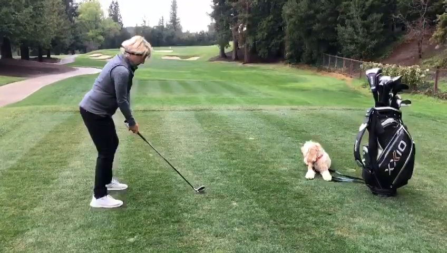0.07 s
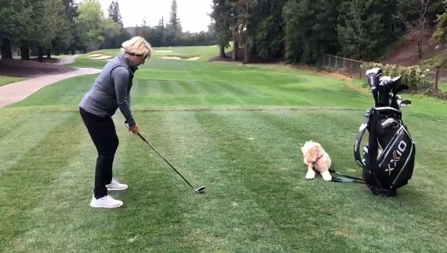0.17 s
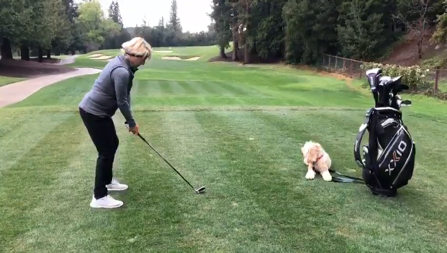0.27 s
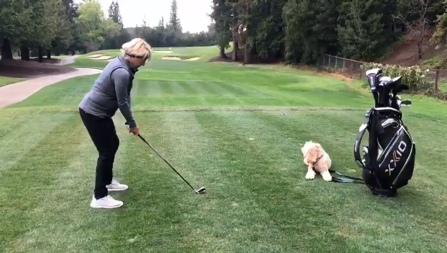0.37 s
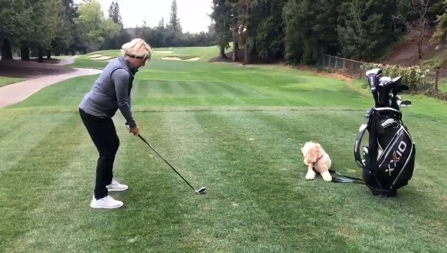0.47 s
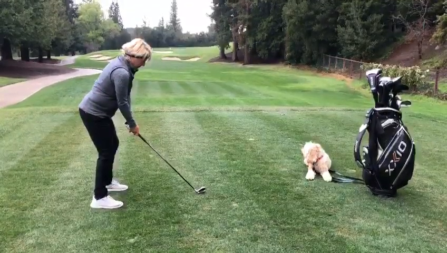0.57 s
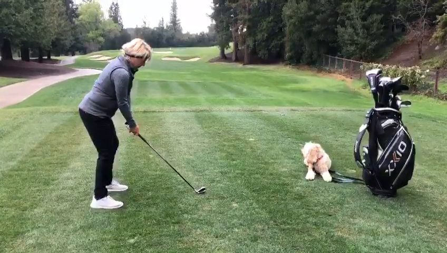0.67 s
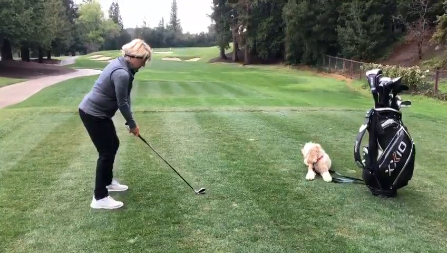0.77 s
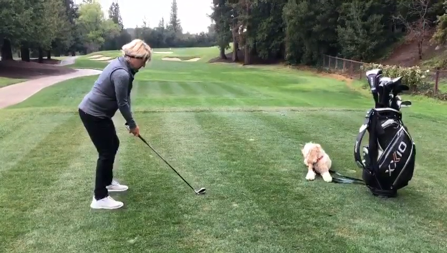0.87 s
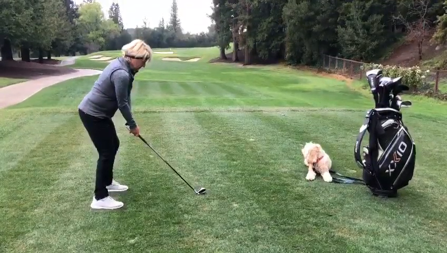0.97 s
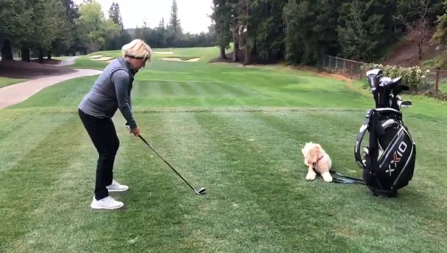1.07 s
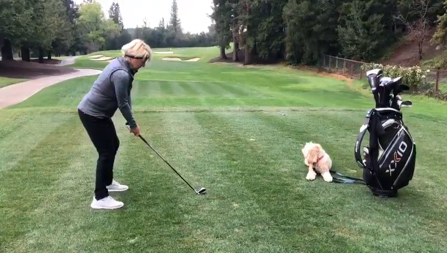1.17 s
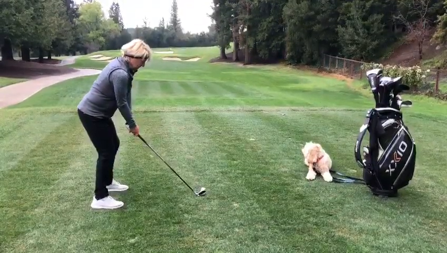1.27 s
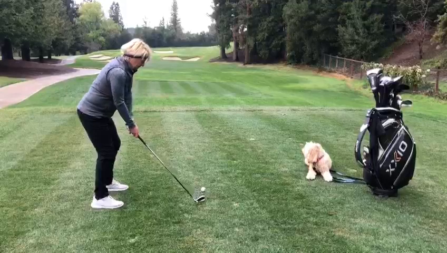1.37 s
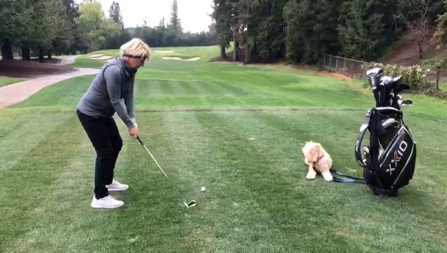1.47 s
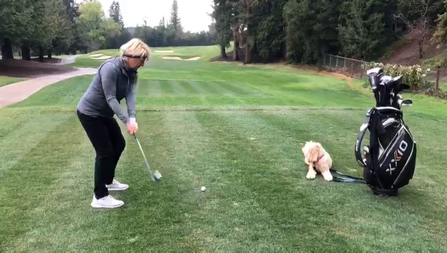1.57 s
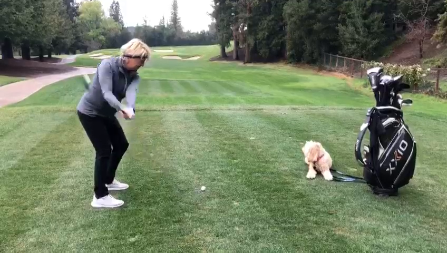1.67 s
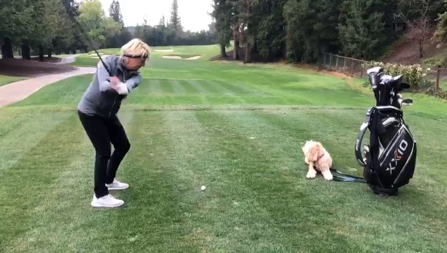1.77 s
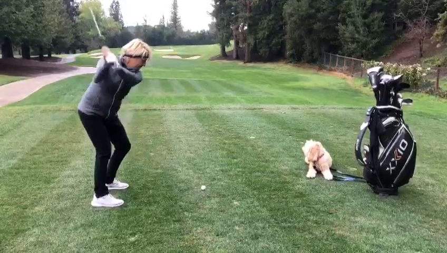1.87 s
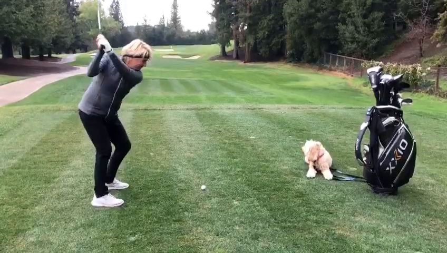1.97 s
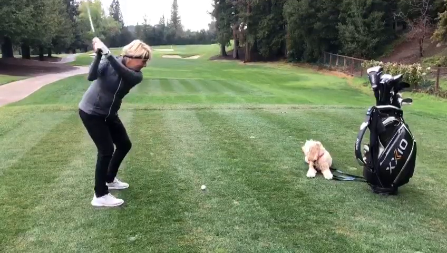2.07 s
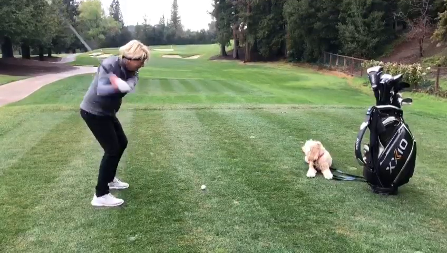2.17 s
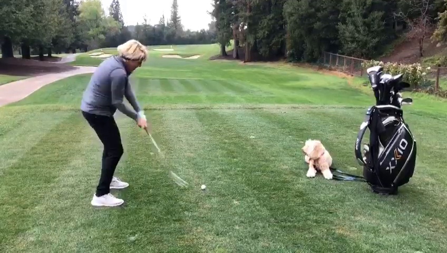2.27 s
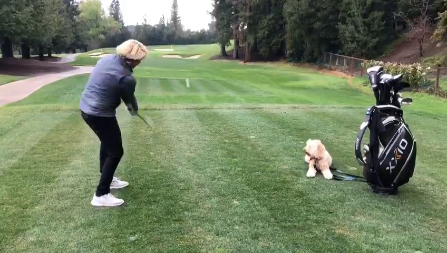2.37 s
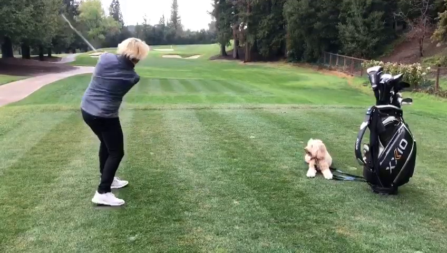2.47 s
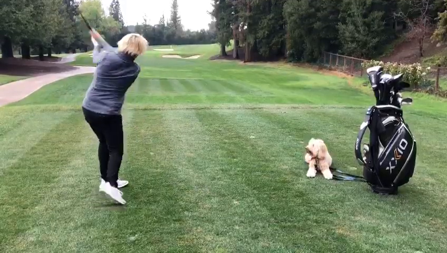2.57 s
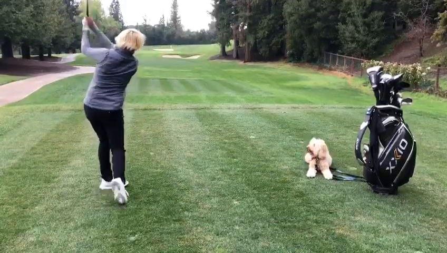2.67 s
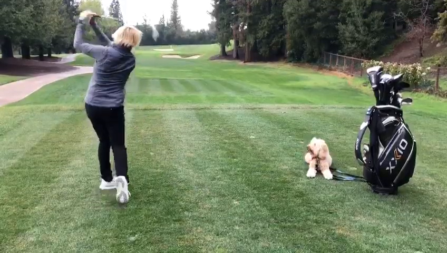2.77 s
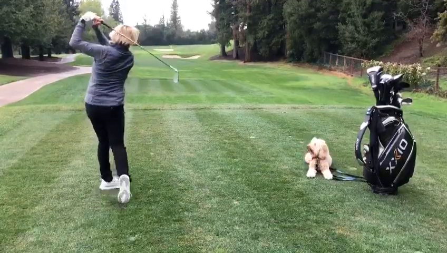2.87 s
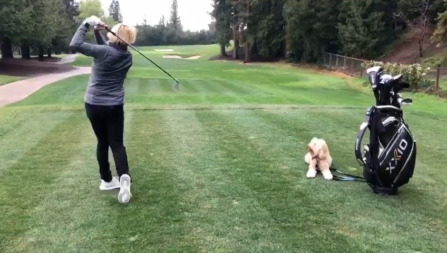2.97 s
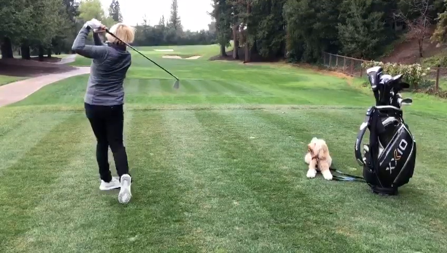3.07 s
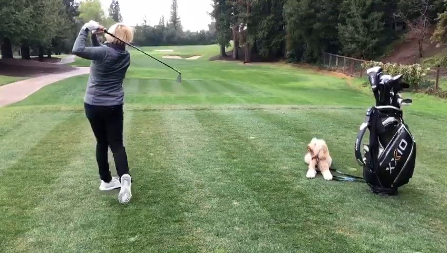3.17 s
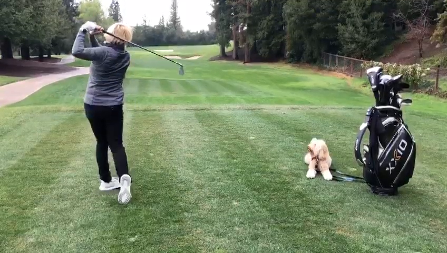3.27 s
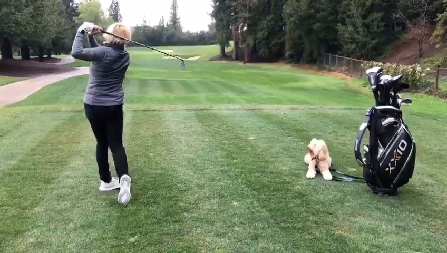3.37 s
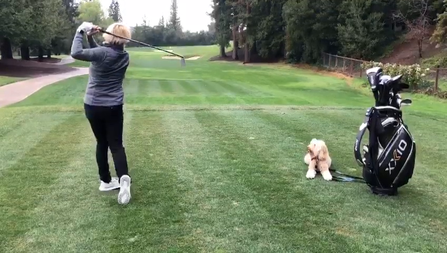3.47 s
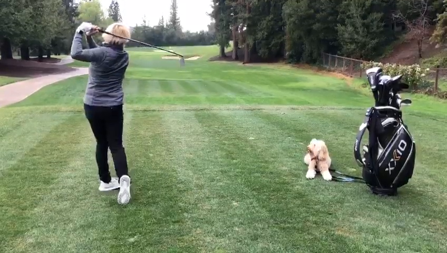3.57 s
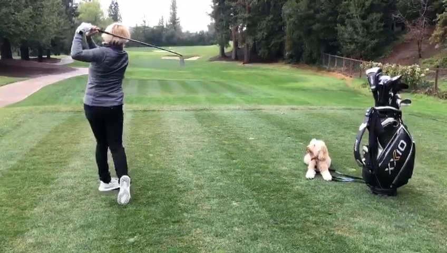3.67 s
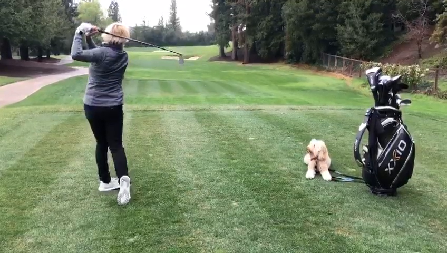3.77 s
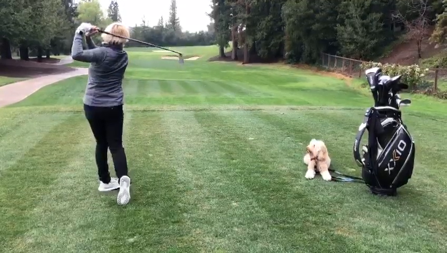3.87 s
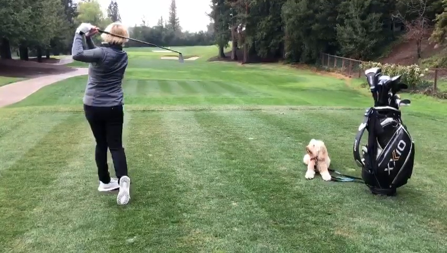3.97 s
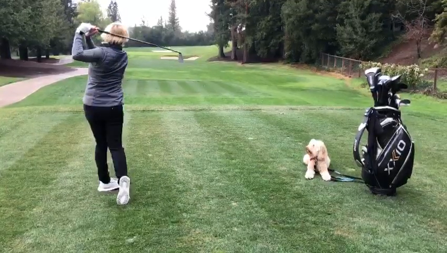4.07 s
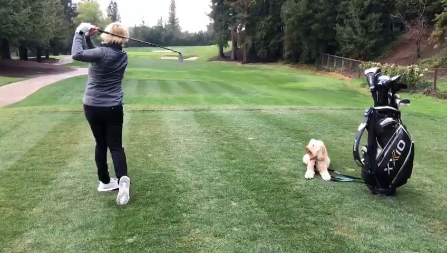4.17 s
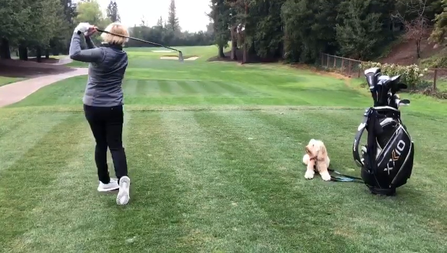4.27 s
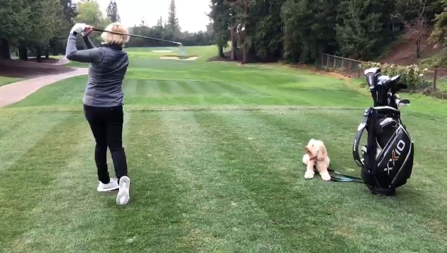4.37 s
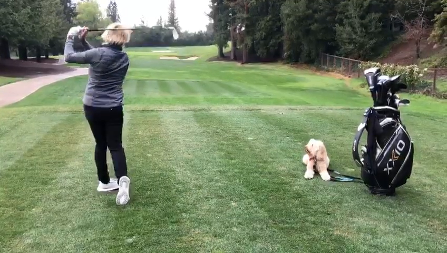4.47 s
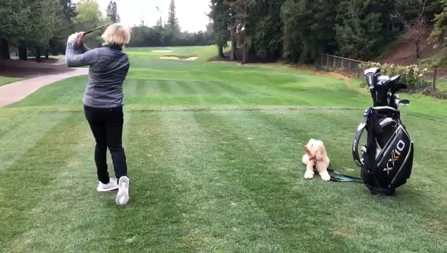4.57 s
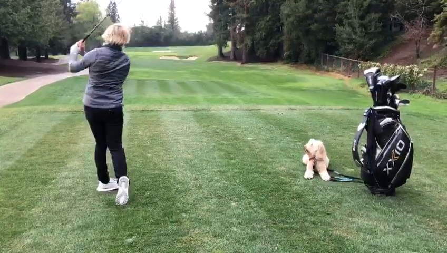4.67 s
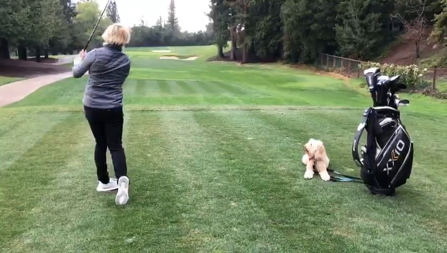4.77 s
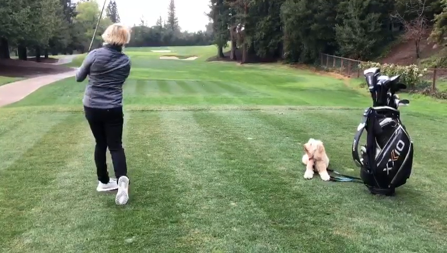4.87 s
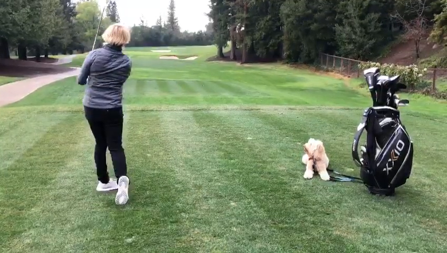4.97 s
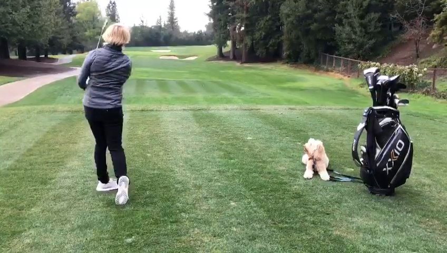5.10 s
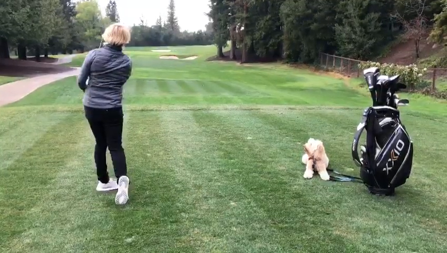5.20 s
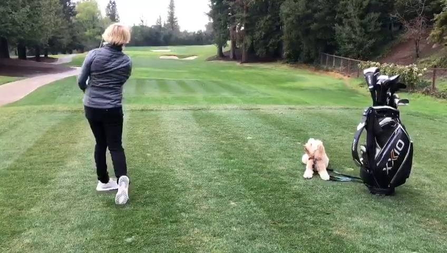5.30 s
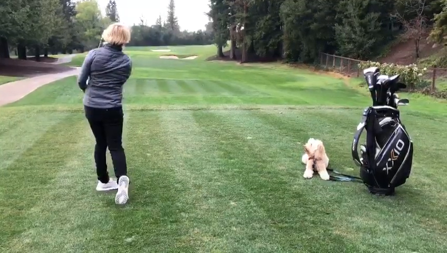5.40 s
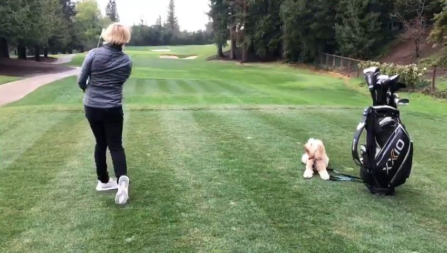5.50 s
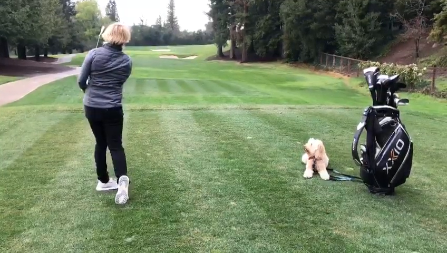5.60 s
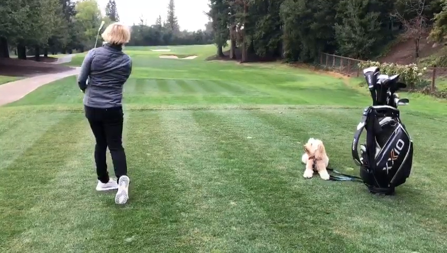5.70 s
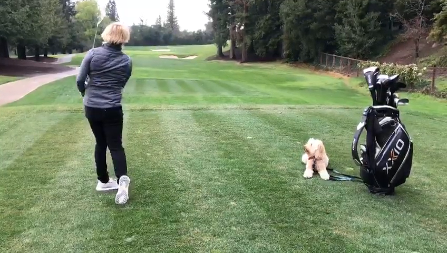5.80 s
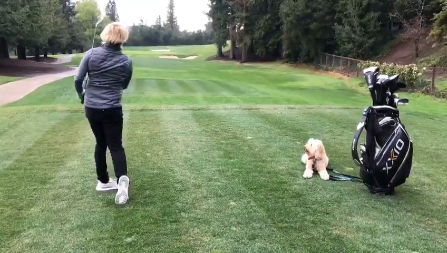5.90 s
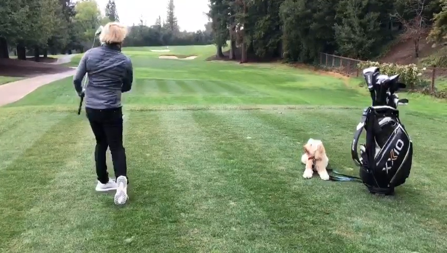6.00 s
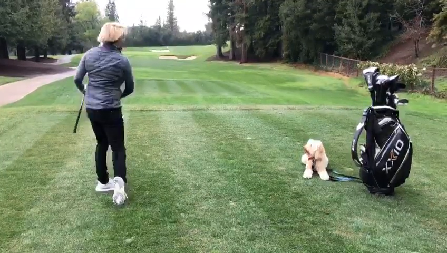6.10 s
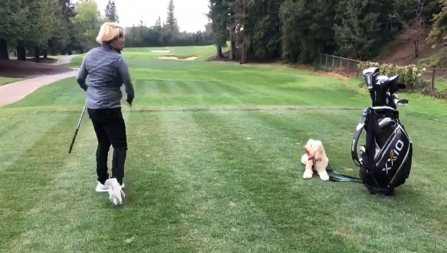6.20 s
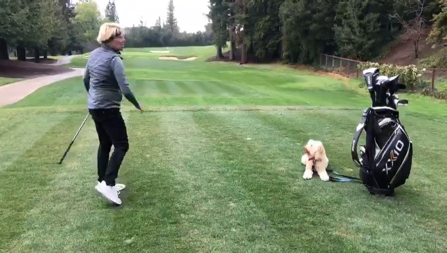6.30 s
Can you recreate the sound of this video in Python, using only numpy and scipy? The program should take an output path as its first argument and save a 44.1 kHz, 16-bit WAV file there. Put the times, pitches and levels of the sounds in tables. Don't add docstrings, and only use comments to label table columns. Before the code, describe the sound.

A single golf shot heard from a few metres behind the player. Low distant traffic and thin repeated bird whistles fill the open air. Jacket fabric rubs quietly, then a brief airy whoosh rises into a very short, clicky metallic smack with a small thud beneath. The crack sputters back from fence and woods and fades; birds resume, with a faint late clothing rustle.

```python
import sys
import numpy as np
from scipy import signal
from scipy.fft import rfft, irfft, next_fast_len
from scipy.io import wavfile
from scipy.ndimage import uniform_filter1d

SR = 44100
rng = np.random.default_rng(int(sys.argv[2]) if len(sys.argv) > 2 else 0)


def linear_from_db(decibels):
    return 10 ** (np.asarray(decibels, float) / 20)


def master_out(mix):
    frames = np.transpose(np.atleast_2d(mix))
    ceiling = np.clip(frames, -1, 1)
    pcm = np.round(ceiling * 32767).astype(np.int16)
    wavfile.write(sys.argv[1], SR, pcm)


N = 279682
T = np.arange(N) / SR

# (frequency [Hz], density [dB per Hz])
ROAD_COLOUR = [(20, -49.5), (41, -9.5), (78, 3), (120, -4), (200, -7.5), (340, -16.5), (700, -9.5),
               (1000, -9.5), (1900, -25), (2300, -31.5), (3200, -36.5), (4500, -44.5), (6500, -51),
               (11500, -58), (13000, -72.5)]
# (time [s], whistle level [dB], share of the fall sung [1 =
# whole], tick level [dB])
SONG_FIGURES = [(.289, -75, .9, -77), (.45, -71, 0.79, -78), (.611, -69, .8, -80), (.769, -69.5, .8, -76),
                (.934, -71, 0.71, -79), (1.094, -77, .9, -80), (1.256, -71, 0.7, -79),
                (1.432, -76, .99, -81), (4.161, -76, .85, -77.5), (4.328, -73, .9, -76),
                (4.489, -72, .95, -74), (4.649, -68.5, .99, -77), (4.818, -71, .9, -77),
                (4.985, -72, 1.1, -77), (5.152, -71, 1.1, -75)]
# (time [s], length [s], from [Hz], to [Hz], level [dB])
THIN_NOTES = [(2.711, .006, 8500, 9800, -68), (0.002, 0.014, 6420, 6380, -84),
              (0.024, 0.024, 6400, 6330, -75), (.118, .013, 6850, 6900, -80), (1.118, .02, 4350, 4100, -72),
              (4.63, .06, 6300, 6450, -83.5), (5.195, .025, 3900, 3750, -80),
              (4.835, .012, 7300, 7700, -82), (3.87, .047, 4730, 4070, -81.5),
              (4.676, .022, 5220, 5380, -73), (4.7, .03, 4300, 3700, -75), (5.04, .06, 3600, 3100, -78)]
# (time [s], frequency [Hz], level [dB], t60 [s])
CHIPS = [(0.09, 6900, -80, 0.3), (1.533, 7050, -69, .06), (3.963, 7200, -69, 0.063),
         (3.99, 7100, -81.5, .5), (5.037, 6650, -73.5, .15), (5.068, 6900, -77, .25),
         (5.673, 6950, -71, .12), (5.697, 6800, -73, .15), (5.728, 7050, -77, .4)]
# (fullest at [s], swell [s], hold [s], fade [s], level [dB])
CLOTH_MOVES = [
    (1.4, .12, .05, .15, -86),
    (1.65, 0.19, .16, 0.34, -70.5),
    (2.331, .3, .03, .06, -71.5),
    (6.1, .14, 0.057, .15, -81.5),
]
# (frequency [Hz], density [dB per Hz])
CLOTH_COLOUR = [(1500, -8.5), (2500, 1.5), (5000, -2), (8000, -4.5), (11000, -7.5), (13000, -14.5)]
RUSTLE_TIMES = [1.98, 2.17, 2.72]
# (time [s], speed [share of top speed])
CLUB_SPEED = [(2.26, .4), (2.30, .55), (2.345, 0.65), (2.37, 0.83), (2.388, 0.96), (2.42, 0.98),
              (2.437, 0.79), (2.47, 0.75), (2.52, 0.47)]
# (frequency [Hz], density [dB per Hz])
SWISH_HISS = [(2000, -3), (3200, -1.5), (5500, -7.5), (8000, -6.5), (11500, -10.5), (13000, -31)]
# (frequency [Hz], density [dB per Hz])
RETURN_COLOURS = [
    [(700, -13.5), (1200, 0), (2200, -4), (4300, -4.5), (7000, -7.5), (9000, -6), (12000, -12)],
    [(3000, -20), (5000, -12.5), (5700, -1.5), (7500, 4), (8600, -2.5), (10500, -6), (12500, -15)],
    [(1500, -21), (2400, -4.5), (3500, -8.5), (4200, -1), (4700, -5), (5100, -10.5), (6200, -5),
     (7500, -10.5), (9000, -14.5), (11500, -19.5), (13000, -29.5)],
]
# (start [s], rise [s], t60 [s], level [dB])
GROUND_RETURNS = [(2.4386, .0007, 0.043, -38), (2.446, .002, .025, -46), (2.684, .002, .05, -60)]
FENCE_RETURNS = [(2.4441, 0.00197, .04, -43), (2.484, 0.0034, 0.11, -41.5)]
TREE_RETURNS = [(2.45, .01, .52, -54), (2.4635, .0012, .03, -49), (2.488, 0.0084, 0.63, -53),
                (2.58, .07, 1.0, -61), (2.709, .003, 0.074, -73), (2.92, .06, .84, -70.5)]
# (time [s], length [s], from [Hz], to [Hz], level [dB])
FENCE_CHIRPS = [(2.679, .008, 3100, 4600, -64), (2.6845, .0085, 2250, 2650, -50),
                (2.691, .008, 2650, 2950, -58)]
# (time [s], frequency
# [Hz], level [dB], t60 [s])
TRUNKS = [(2.458, 8800, -48, .03), (2.464, 2150, -48, .03), (2.464, 4290, -54, .03),
          (2.492, 4130, -47, .06), (2.499, 4450, -55, .06), (2.512, 4080, -54, .1), (2.518, 6100, -54, .1),
          (2.531, 4300, -58, .08), (2.545, 6400, -58, .08), (2.56, 3950, -59, .05), (2.58, 4250, -59, .08),
          (2.594, 4450, -57, .05), (2.596, 5950, -61, .06), (2.604, 4300, -60, .08),
          (2.636, 4500, -60, .08), (2.654, 6700, -66, .05), (2.686, 6700, -63, .04),
          (2.729, 6600, -64, 0.048), (3.7165, 950, -44, .03)]
# (time [s], strength [dB], contact brightness [Hz])
CONTACTS = [
    (2.43623, 3.7, 4800.0),
    (2.43674, -4.3, 3300.0),
    (2.43773, -9.3, 2400.0),
    (2.43879, -29.9, 19900.0),
    (2.44105, -15.6, 2400.0),
]
# (frequency [Hz], level [dB], t60 [s])
STRIKE_MODES = [(262.4, -38.5, 0.096), (372, -40, 0.014), (595, -33, .035), (928.6, -32, 0.039),
                (1153, -20.5, 0.0159), (1651, -14.8, 0.0088), (2239, -23.5, 0.0136), (2747, -29.5, 0.0114),
              (3540, 7.5, 0.0022), (4215, -17.7, 0.0094), (5368, 10.1, 0.0024), (6406, -9.7, 0.0094),
              (6782, 15.0, 0.0021), (8931, 8.3, 0.0068), (9901, -14.4, 0.0125), (11036, 8.5, 0.0029)]


def rms_one(x):
    return x / np.sqrt(np.mean(x ** 2) + 1e-20)


def drift(rate):
    knots_per_s = 64
    knots = rng.standard_normal(int(N / SR * knots_per_s) + 130)
    r = np.exp(-2 * np.pi * rate / knots_per_s)
    slow = signal.lfilter([1], [1, -2 * r, r * r], knots)[128:]
    return np.interp(T * knots_per_s, np.arange(len(slow)), rms_one(slow))


def coloured(spectrum):
    size = next_fast_len(N)
    hz = np.maximum(np.fft.rfftfreq(size, 1 / SR), 1)
    points = np.array(spectrum)
    gain = linear_from_db(np.interp(np.log(hz), np.log(points[:, 0]), points[:, 1], right=-120))
    return rms_one(irfft(rfft(rng.standard_normal(size)) * gain, size)[:N])


def curve(rows, column, rest):
    rows = np.array(rows)
    return np.interp(T, rows[:, 0], rows[:, column], left=rest, right=rest)


def dying(start, rise, t60):
    out, at = np.zeros(N), int(start * SR)
    age = T[:min(int(t60 * SR), N - at)]
    out[at:at + len(age)] = (1 - np.exp(-age / rise)) * linear_from_db(-60 * age / t60)
    return out


def add_whistle(out, start, length, from_hz, to_hz, level_db, bend):
    u = np.arange(int(length * SR)) / (length * SR)
    phase = 2 * np.pi * np.cumsum(from_hz + (to_hz - from_hz) * u ** bend) / SR
    at = int(start * SR)
    out[at:at + len(u)] += linear_from_db(level_db) * np.sin(np.pi * u) ** 0.12 * np.sin(phase)


def scraps(rows, below_hz, above_hz):
    out, white = np.zeros(N), rng.standard_normal(N)
    for s, hz, db, t60 in rows:
        band = signal.butter(2, [hz - below_hz, hz + above_hz], "band", fs=SR, output="sos")
        span = slice(int(s * SR), int((s + .3) * SR))
        burst = rms_one(signal.sosfilt(band, white[span]))
        out[span] += linear_from_db(db) * burst * dying(s, .0015, t60)[span]
    return out


def whine():
    return linear_from_db(-89.5) * np.sin(2 * np.pi * 9980.6 * T + 0.37 * drift(3.0))


def road():
    noise = coloured(ROAD_COLOUR)
    rumble = signal.sosfiltfilt(signal.butter(2, 200, fs=SR, output="sos"), noise)
    rumble_db = .6 - 0.27 * T + 0.52 * drift(2.2)
    roar = (noise - rumble) * linear_from_db(0.26 * drift(3.0))
    pass_s, pass_length_s, pass_db = 2.1, 0.58, 0.87
    passing_db = pass_db * np.exp(-((T - pass_s) / pass_length_s) ** 2)
    level_db = -44.5 - 0.11 * T + passing_db
    return linear_from_db(level_db) * (roar + linear_from_db(rumble_db) * rumble)


def song():
    out = np.zeros(N)
    whistle_hz, whistle_s, whistle_fall = 4600, .048, .855
    tick_hz, tick_s, tick_fall = 6050, .011, .865
    pitch_spread, tick_spread_db = .004, 3.0
    offsets = 1 + pitch_spread * rng.standard_normal((len(SONG_FIGURES), 3))
    for (s, whistle_db, sung, tick_db), off in zip(SONG_FIGURES, offsets):
        from_hz = whistle_hz * off[0]
        to_hz = (1 - (1 - whistle_fall) * sung ** 2) * from_hz
        add_whistle(out, s, whistle_s * sung, from_hz, to_hz, whistle_db, bend=1.87)
        for after_s, share in zip((.092, .112), off[1:]):
            from_hz = tick_hz * share
            level_db = tick_db + 0.5 + tick_spread_db * np.sin(900 * share)
            add_whistle(out, s + after_s * share, tick_s, from_hz, tick_fall * from_hz, level_db, bend=.5)
    return out


def birds():
    whistles = song()
    for note in THIN_NOTES:
        add_whistle(whistles, *note, bend=0.86)
    age = np.arange(int(.25 * SR)) / SR
    echoes = rng.standard_normal(len(age)) * linear_from_db(-60 * age / 0.44)
    whistles = whistles * linear_from_db(1.1 * drift(22))
    whistles = whistles + linear_from_db(-34.5) * signal.fftconvolve(whistles, echoes)[:N]
    return whistles + scraps(CHIPS, below_hz=300, above_hz=450)


def cloth():
    depth_db = 21.5
    rub = np.zeros(N)
    for s, swell, hold, fade, db in CLOTH_MOVES:
        away = np.maximum((s - T) / swell, (T - s - hold) / fade)
        rub += linear_from_db(db - depth_db * np.maximum(away, 0))
    ticks = sum(linear_from_db(-68) * dying(s, .001, 0.029) for s in RUSTLE_TIMES)
    return (linear_from_db(3.0 + 1.6 * drift(14)) * rub + ticks) * coloured(CLOTH_COLOUR)


def eddies(speed, white):
    out, state = np.zeros(N), np.zeros(2)
    centre = 2080 * speed
    for i in range(int(CLUB_SPEED[0][0] * SR) + 1, int(CLUB_SPEED[-1][0] * SR), 128):
        r = np.exp(-np.pi * .48 * centre[i] / SR)
        gain = np.sqrt(1 - r * r)
        poles = [1, -2 * r * np.cos(2 * np.pi * centre[i] / SR), r * r]
        out[i:i + 128], state = signal.lfilter([gain / 2, 0, -gain / 2], poles, white[i:i + 128], zi=state)
    out = signal.sosfilt(signal.butter(2, 3300, fs=SR, output="sos"), out)
    return linear_from_db(-37) * speed ** 6.0 * linear_from_db(2.2 * drift(25)) * out


def swish():
    white = rng.standard_normal(N)
    speed = curve(CLUB_SPEED, 1, 0)
    wake_band = signal.butter(2, (230, 564), "band", fs=SR, output="sos")
    wake = rms_one(signal.sosfilt(wake_band, white[::-1]))
    wake = linear_from_db(-49.5) * np.roll(speed, int(.012 * SR)) ** 3.5 * wake
    hiss_speed = np.roll(uniform_filter1d(speed, int(.03 * SR)), int(.006 * SR))
    hiss = linear_from_db(-53) * hiss_speed ** 9 * coloured(SWISH_HISS)
    return eddies(speed, white) + hiss + wake


def returns():
    out = np.zeros(N)
    for colour, rows in zip(RETURN_COLOURS, (GROUND_RETURNS, FENCE_RETURNS, TREE_RETURNS)):
        noise = coloured(colour) * linear_from_db(1.1 * drift(30.0))
        for s, rise, t60, db in rows:
            out += linear_from_db(db) * dying(s, rise, t60) * noise
    for chirp in FENCE_CHIRPS:
        add_whistle(out, *chirp, bend=0.46)
    return out + scraps(TRUNKS, below_hz=230, above_hz=280)


def strike():
    strike_db, squash_s = .8, .00067
    first = int(CONTACTS[0][0] * SR) - 64
    span = slice(first, first + 4096)
    out = np.zeros(N)
    for s, strength_db, bright_hz in CONTACTS:
        age = np.maximum(T[span] - s, 0)
        push = 1 - np.exp(-age / squash_s)
        for k, (hz, level_db, t60) in enumerate(STRIKE_MODES):
            softness = 1 / (1 + (hz / bright_hz) ** 2)
            ring = push * linear_from_db(-60 * age / t60) * np.sin(2 * np.pi * hz * age)
            sign = (-1) ** (k + 1)
            out[span] += linear_from_db(strike_db + strength_db + level_db) * softness * ring * sign
    return out


def scene():
    background = road() + whine() + birds()
    return (background + cloth() + swish() + returns() + strike())[None]


def band_limit(x):
    return signal.sosfilt(signal.butter(12, 13150, fs=SR, output="sos"), x)


def record(dry):
    cut = signal.sosfilt(signal.ellip(6, .2, 32, 12000, fs=SR, output="sos"), dry)
    return band_limit(cut)


dry = scene()
out = record(dry)
master_out(out)
```